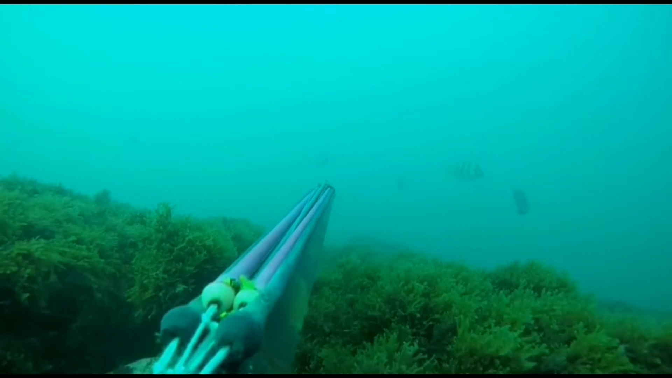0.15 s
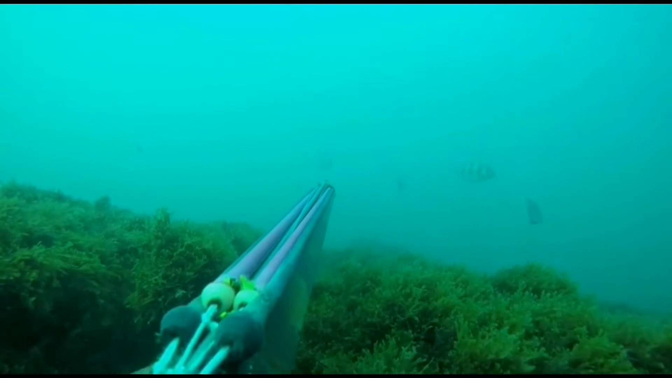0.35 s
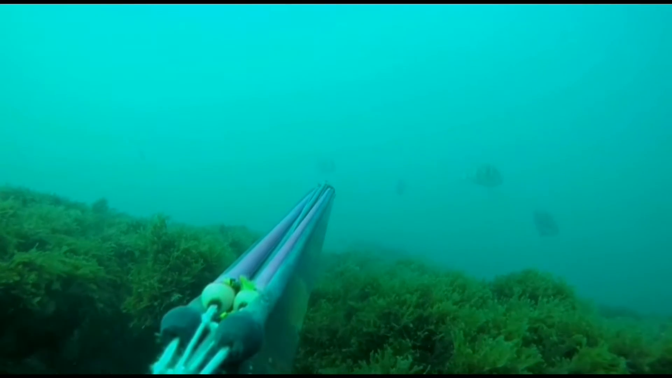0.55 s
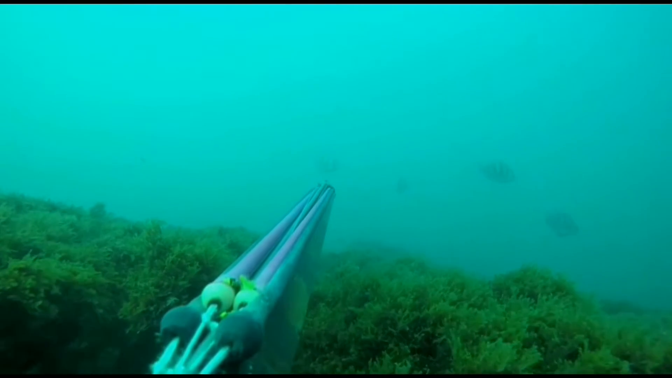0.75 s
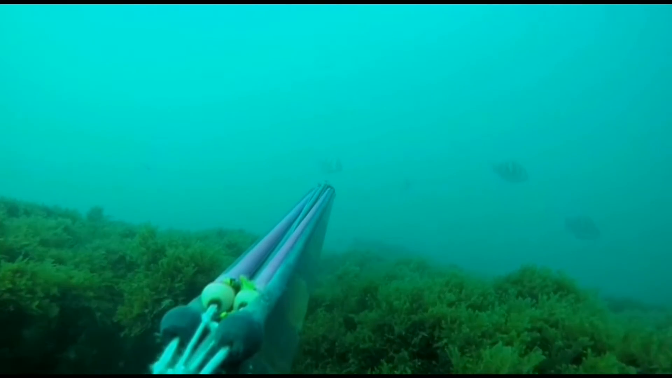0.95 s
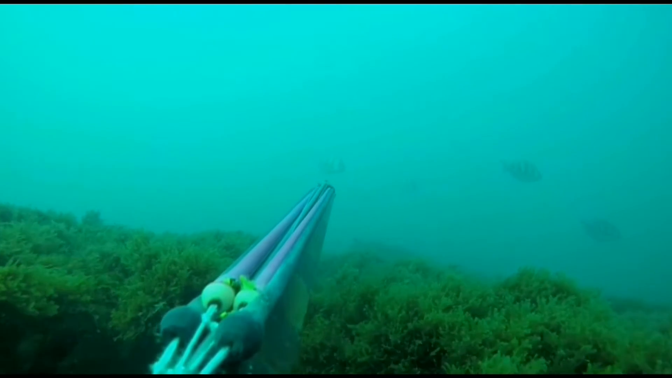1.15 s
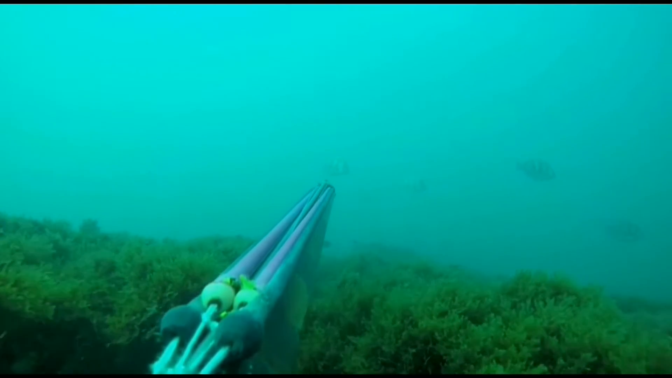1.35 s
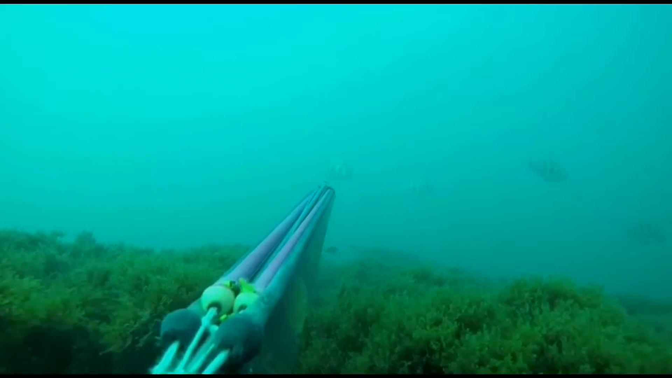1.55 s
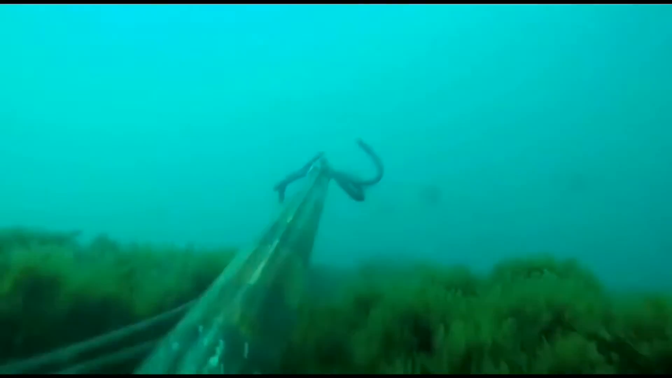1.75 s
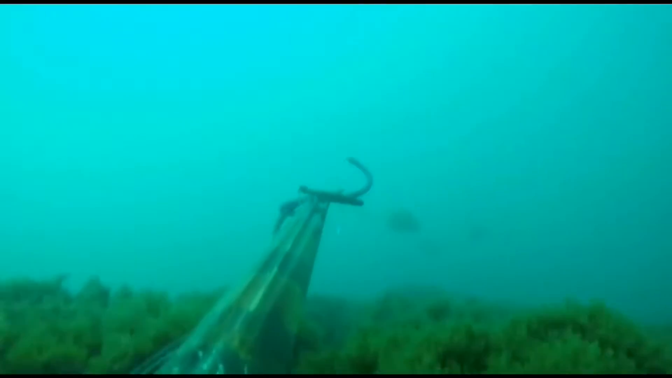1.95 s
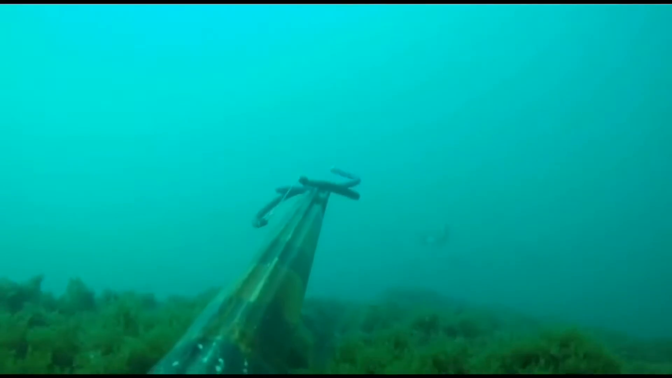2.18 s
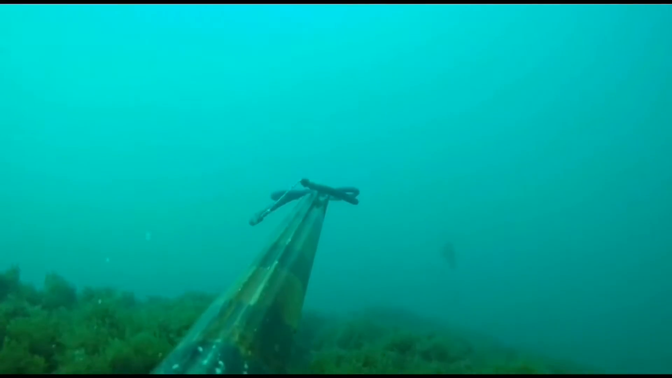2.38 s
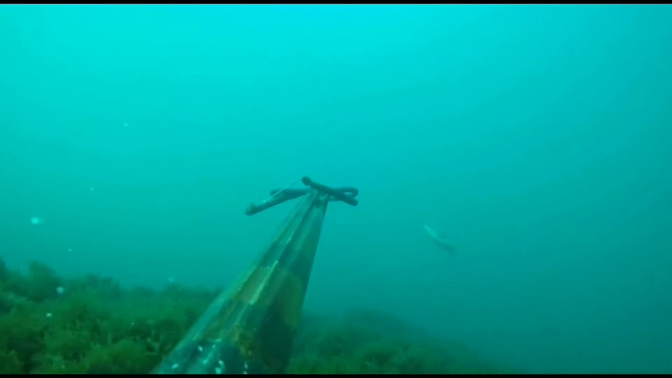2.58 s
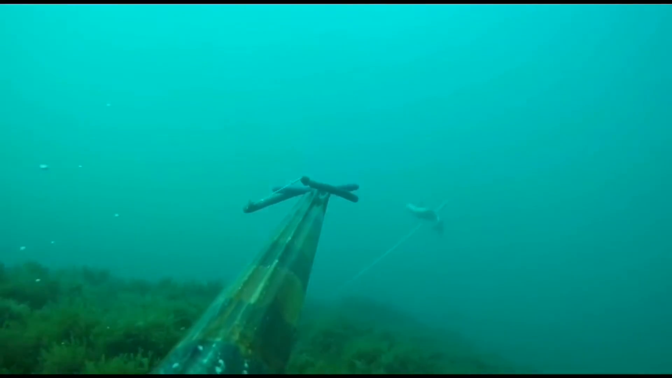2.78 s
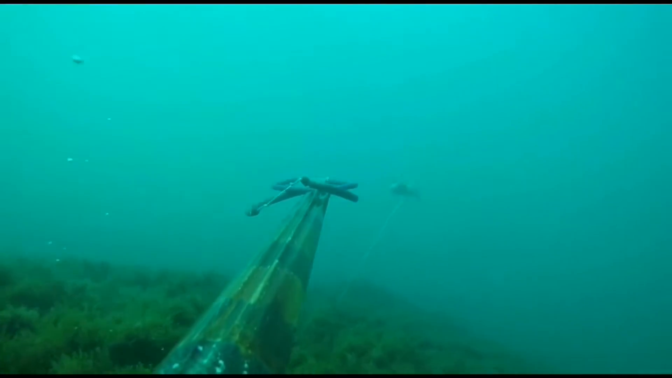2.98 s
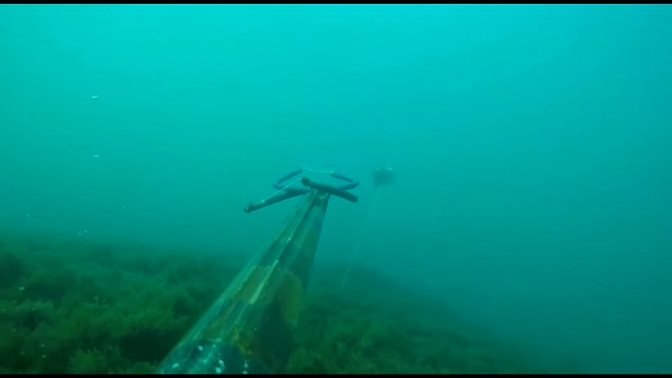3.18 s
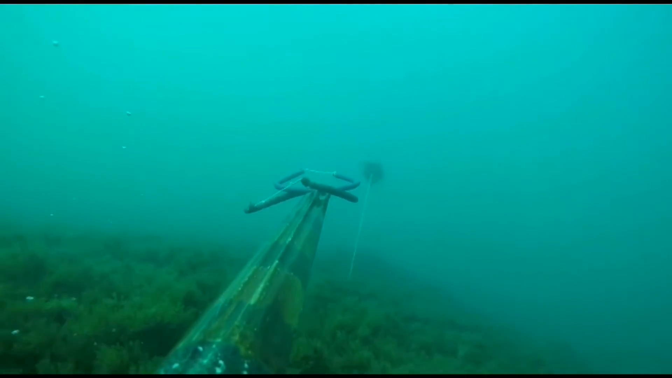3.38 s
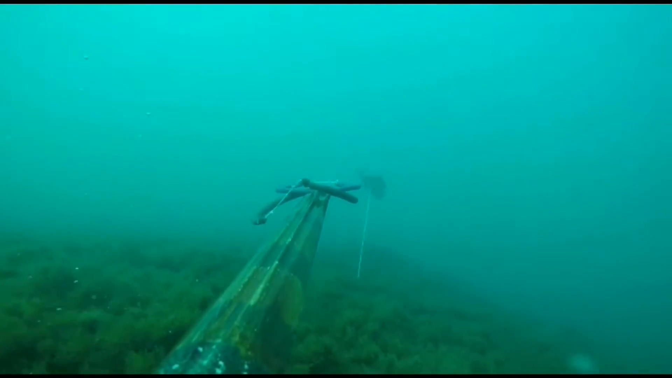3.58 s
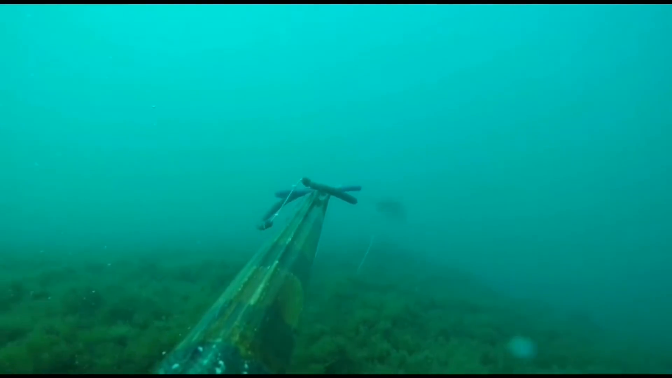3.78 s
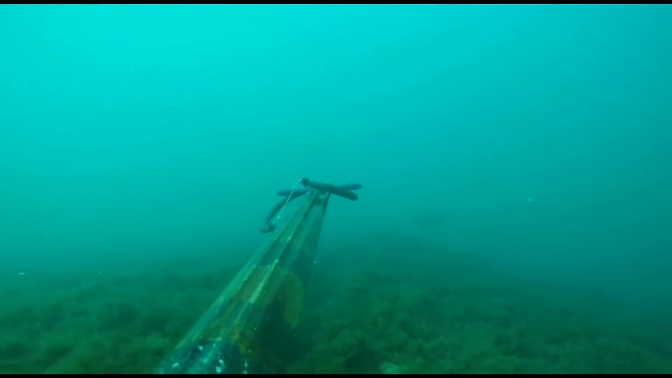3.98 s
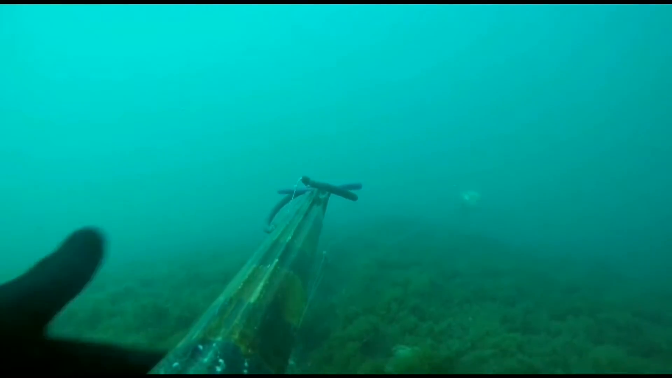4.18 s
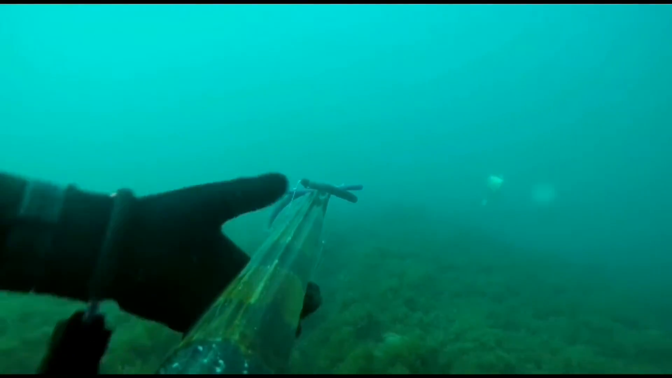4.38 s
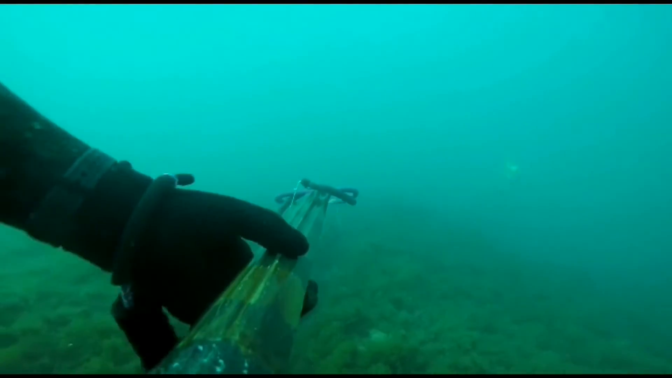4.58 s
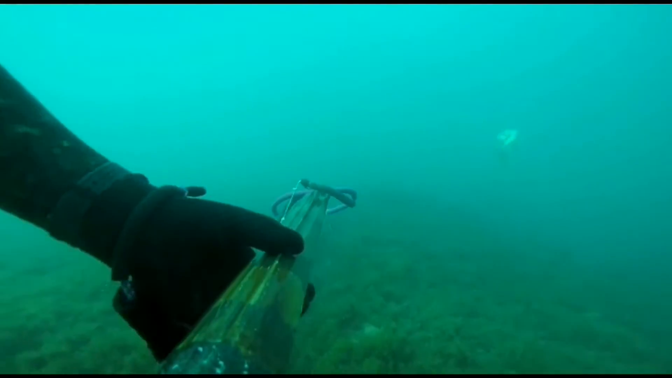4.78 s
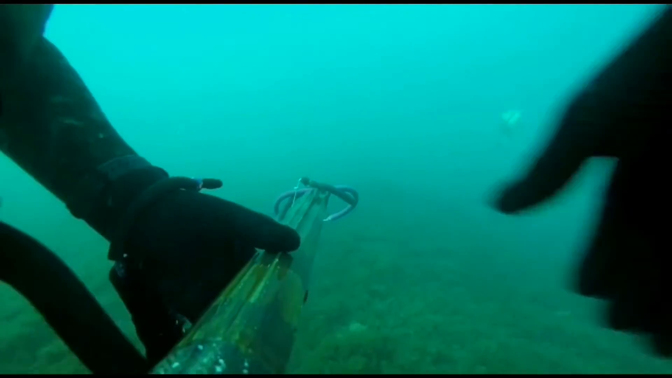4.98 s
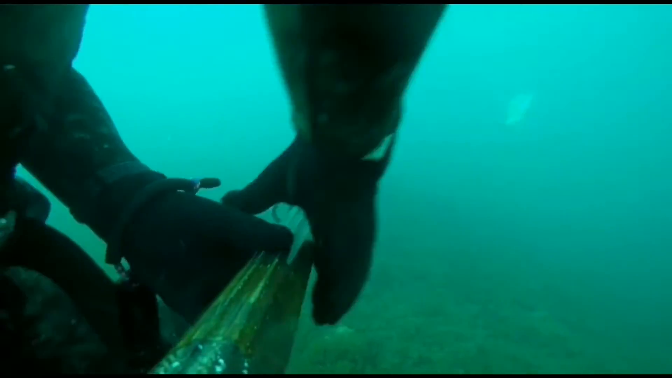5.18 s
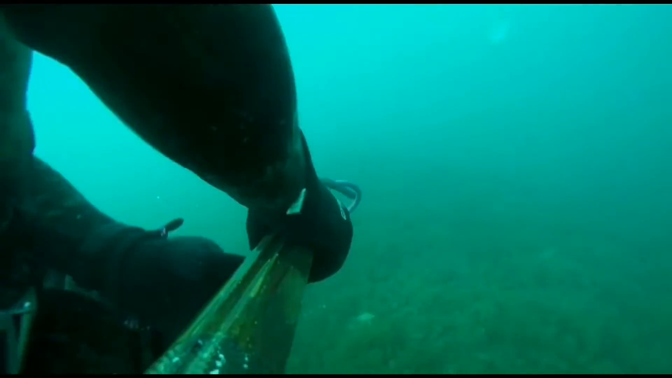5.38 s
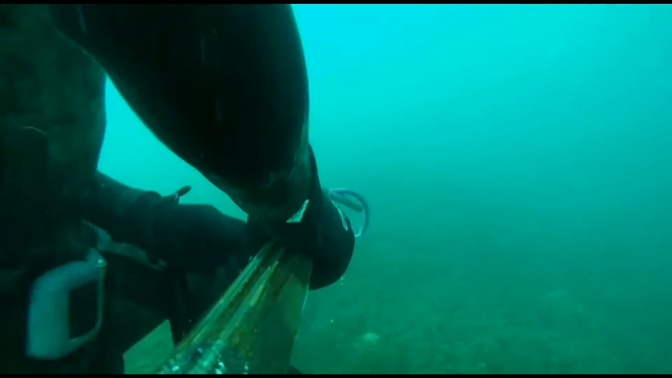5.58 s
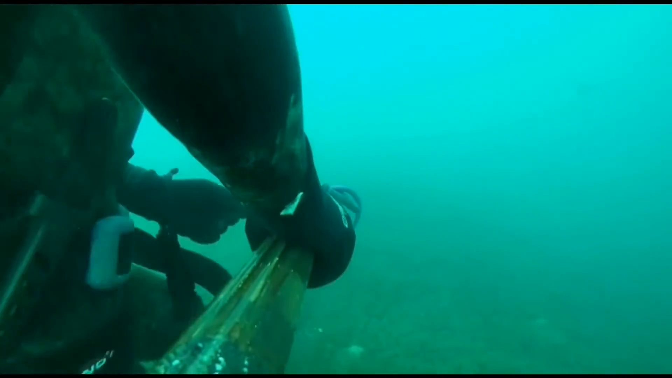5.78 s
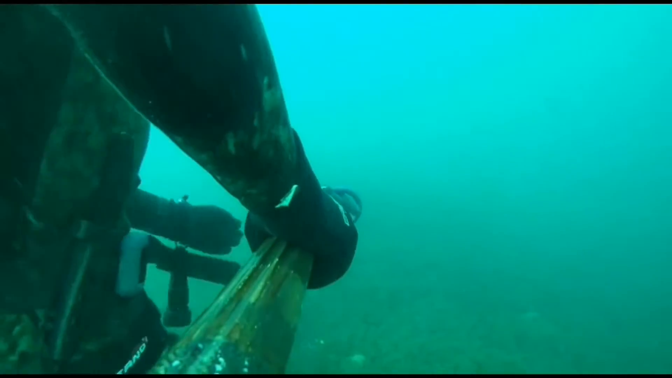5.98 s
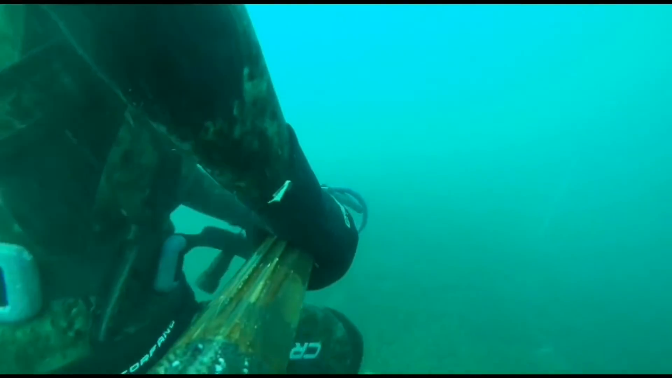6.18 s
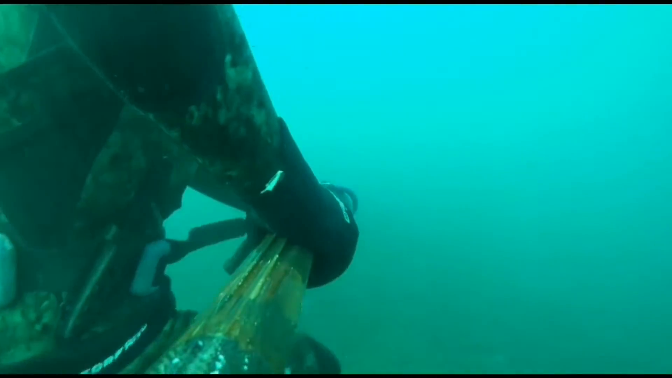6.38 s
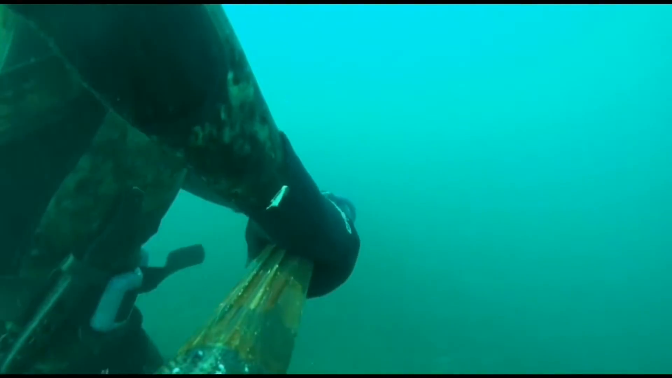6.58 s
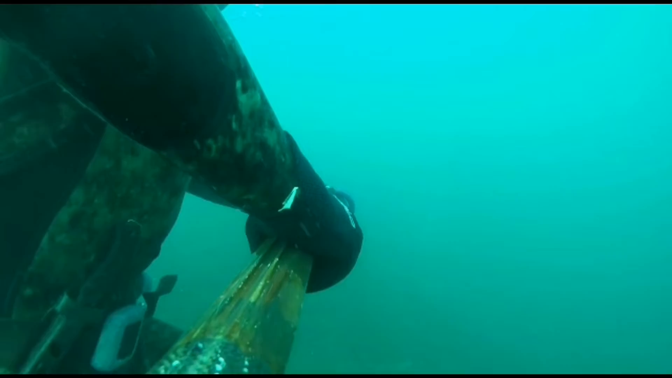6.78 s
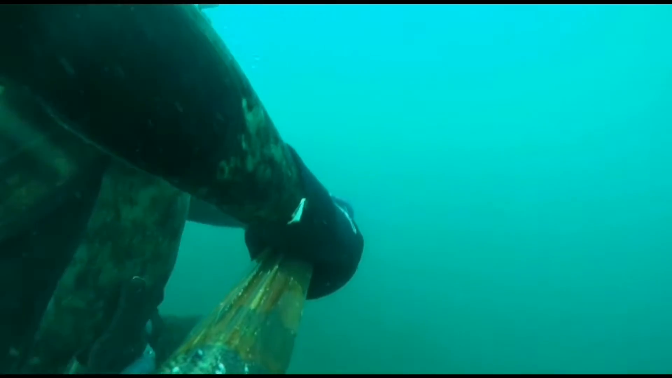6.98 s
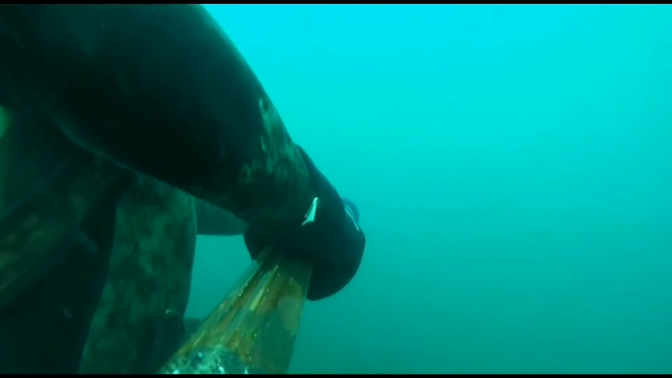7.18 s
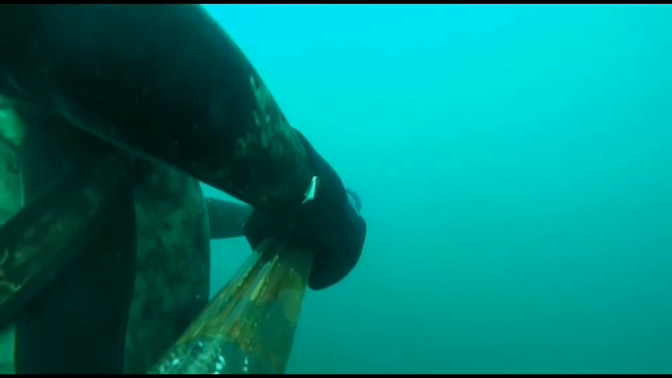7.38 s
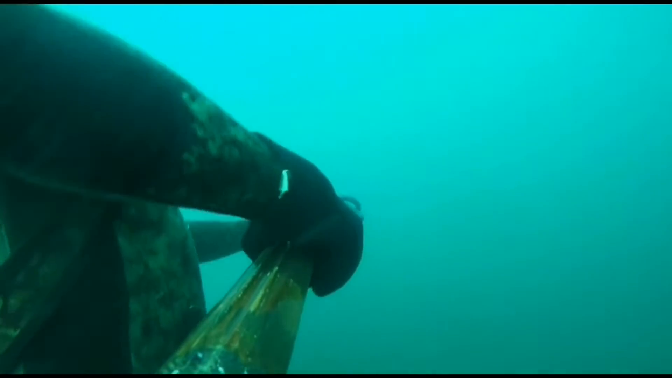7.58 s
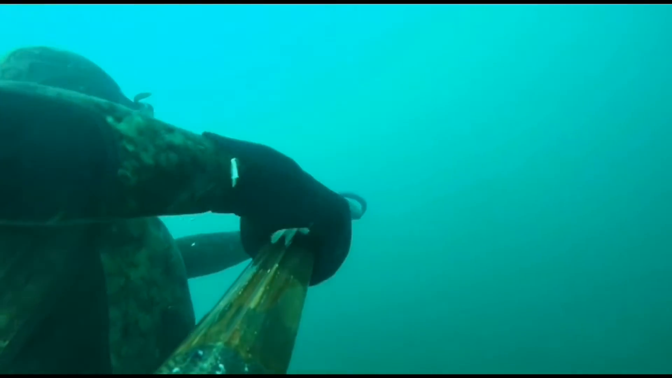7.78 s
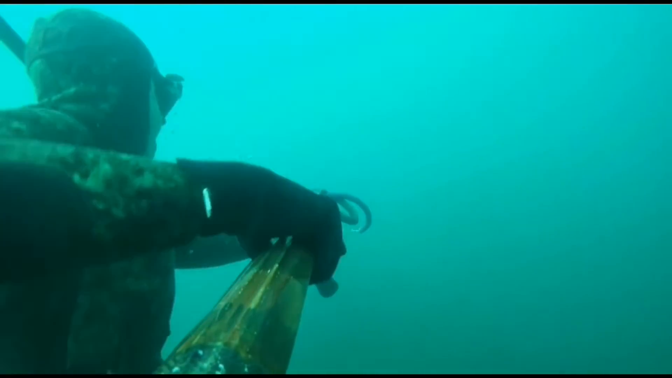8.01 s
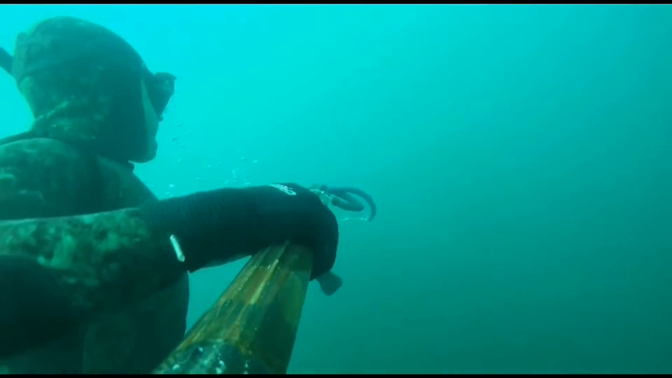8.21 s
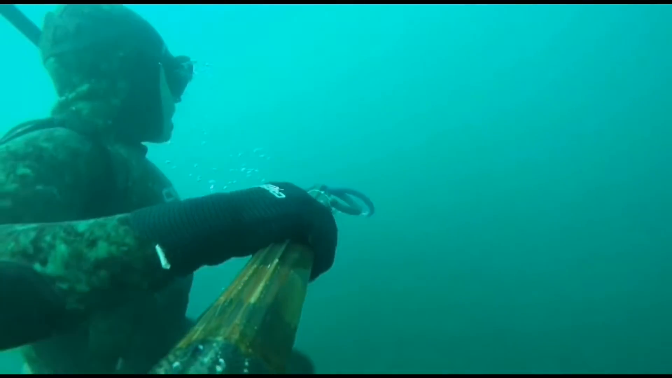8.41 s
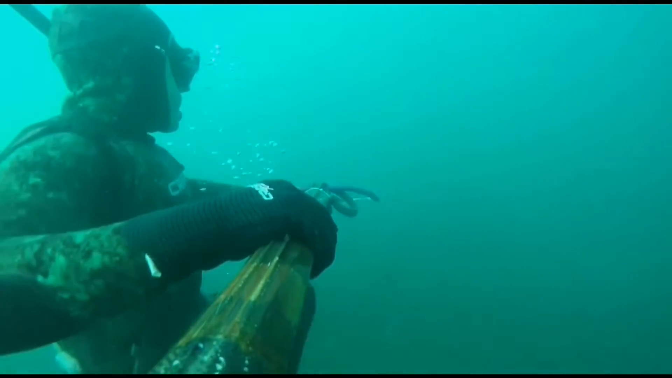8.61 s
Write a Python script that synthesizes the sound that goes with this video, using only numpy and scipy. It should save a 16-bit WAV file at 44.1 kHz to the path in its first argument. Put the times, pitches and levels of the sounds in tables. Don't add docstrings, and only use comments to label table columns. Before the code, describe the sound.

Underwater reef shrimp crackle and snap, then a speargun fires with a hard overloaded metallic crack, followed by muffled water rumble, wooden knocks and squeaks.

```python
import sys
import numpy as np
from scipy import signal
from scipy.io import wavfile
from scipy.ndimage import uniform_filter1d

SR = 44100
rng = np.random.default_rng(int(sys.argv[2]) if len(sys.argv) > 2 else 0)


def decibels_to_gain(level_db):
    exponent = np.asarray(level_db, float) / 20
    return 10 ** exponent


def inscribe(sig):
    pcm = np.round(np.clip(np.atleast_2d(sig).T, -1, 1) * 32767)
    wavfile.write(sys.argv[1], SR, pcm.astype(np.int16))


N = 381465
SHOT_S = 1.766


def rms_one(x):
    return x / np.sqrt(np.mean(x ** 2) + 1e-20)


def in_time(rows):
    s, *columns = np.transpose(rows)
    return [np.interp(np.arange(N) / SR, s, c) for c in columns]


def drift(per_s):
    knots = rng.standard_normal(round(N / SR * per_s) + 2)
    return np.interp(np.arange(N) / SR * per_s, np.arange(len(knots)), knots)


def surges(rows, rise_db_s, fall_db_s):
    t = np.arange(0, N, 64) / SR
    swells = []
    for s, db, held in rows:
        before, after = np.maximum(s - t, 0), np.maximum(t - s - held, 0)
        swells.append(db - rise_db_s * before - fall_db_s * after)
    return np.interp(np.arange(N) / SR, t, np.max(swells, axis=0))


def band(x, low_hz, high_hz, order=2):
    return signal.sosfilt(signal.butter(order, [low_hz, high_hz], "band", fs=SR, output="sos"), x)


def resonate(x, hz, width_hz):
    r = np.exp(-np.pi * width_hz / SR)
    poles = [1, -2 * r * np.cos(2 * np.pi * hz / SR), r * r]
    return signal.lfilter(np.array([1, 0, -1]) * (1 - r * r) / 2, poles, x + 1e-18)


def body(x, modes):
    return sum((-1) ** k * decibels_to_gain(db) * resonate(x, hz, width) for k, (hz, width, db) in enumerate(modes))


def grains(per_s, spread_db, most, size=1):
    sizes = decibels_to_gain(spread_db * np.minimum(rng.exponential(1, N), most)) * (rng.random(N) < per_s / SR)
    envelope = np.convolve(sizes, np.hanning(size + 2)[1:-1], "same")
    return rms_one(envelope * rng.standard_normal(N))


def evened(x, seconds, share):
    level = np.sqrt(uniform_filter1d(x ** 2, round(seconds * SR)) + 1e-12)
    return rms_one(x / level ** share)


def add(out, s, shape):
    i = round(s * SR)
    out[i:i + len(shape)] += shape[:N - i]


def dying(t60, count):
    t = np.arange(count) / SR
    return t, decibels_to_gain(-60 * t / t60)


def ducking_db():
    duck_db, hold_s, spring_s = 27.5, 0.4, 0.1
    creep_db, creep_s = 18.5, 1.18
    since = np.arange(N) / SR - SHOT_S
    free = np.maximum(since - hold_s, 0)
    spring = (duck_db - creep_db) * np.exp(-free / spring_s)
    creep = creep_db * np.maximum(1 - free / creep_s, 0)
    return (since > 0) * -(spring + creep)


# [f/Hz, width/Hz, level/dB]
HOUSING = [(1500, 370, -14), (2118, 110, -2), (2593, 453, -3.5), (3616, 200, -5.5), (4137, 286, -1.5),
           (5550, 670, -3.5), (7340, 1200, -8), (9200, 730, -11), (10520, 1300, -15.5), (14700, 2400, -26)]


def reef():
    crackle_db = -48.5 + ducking_db() + 0.3 * drift(4.3)
    hiss = decibels_to_gain(-4) * rng.standard_normal(N) + decibels_to_gain(-6) * grains(250, 4.5, 2.6, size=30)
    dull = hiss + decibels_to_gain(-7) * grains(200, 4.5, 2.4, size=60)
    bright = hiss + decibels_to_gain(-6.5) * grains(350, 4.5, 2.6, size=30)
    dull, bright = dull * decibels_to_gain(1.8 * drift(30)), bright * decibels_to_gain(2 * drift(30))
    low = decibels_to_gain(-25.5) * band(dull, 800, 2000)
    return decibels_to_gain(crackle_db) * rms_one(body(dull, HOUSING[:4]) + low + body(bright, HOUSING[4:]))


# [t/s, peak level/dB, part over 6 kHz against it/dB]
SNAPS = [(0.0782, -11.5, -14), (0.1348, -11, -8.5), (0.214, -19, -15), (0.3842, -36, 5),
         (0.4915, -22, -4.5), (0.511, -16, -9), (0.6083, -17.5, -22.5), (0.844, -20.5, -5),
         (0.866, -20, -2.5), (0.901, -24, -6), (0.9447, -18.5, -9), (1.051, -20.5, -10), (1.155, -16, -25),
         (1.3008, -20.5, -9.5), (1.3903, -26, -2.5), (1.448, -24.5, -9), (1.4592, -19.5, -7.5),
         (1.517, -21, -10), (1.705, -33, -20), (2.035, -43.5, -12), (2.093, -43.5, -8.5), (2.006, -46, -25),
         (3.4834, -24, -13),
    (3.3113, -21.5, -24),
    (3.673, -22.5, -7),
    (4.1649, -22.5, -0.5),
    (4.251, -20, -10.5),
    (4.3411, -15, -9),
    (4.7851, -11, -11),
    (5.034, -19, -8),
    (5.1815, -21, -5.5),
]
# [t/s, peak level/dB, part over 6 kHz against
# it/dB]
MORE_SNAPS = [(0.0278, -31, -16), (0.1735, -30, -14), (0.272, -38, -11.5), (0.3421, -38, -16),
              (0.4609, -36, -11), (0.7352, -29, -14), (0.815, -39, -17), (0.832, -25.5, -16),
              (0.9154, -27.5, -16), (1.0018, -34, -24), (1.1036, -33, -16.5), (1.1243, -29, -17),
              (1.1842, -32, -22), (1.269, -32.5, -10), (1.3656, -26.5, -18), (1.4915, -25.5, -16),
              (1.6372, -34, -18), (1.6756, -33, -20), (2.3675, -42.5, -16), (2.4049, -37, -18),
              (2.5506, -43, -15), (2.6609, -44, -15), (2.958, -36, -15), (2.9801, -34.5, -19),
              (3.0415, -36, -18), (3.113, -26, -22), (3.1577, -34.5, -12), (3.2151, -27.5, -14),
              (3.34, -30.5, -14), (3.4228, -33.5, -11), (3.4944, -28.5, -19), (3.5064, -26, -20),
              (3.5299, -23.5, -23), (3.5922, -30, -21), (3.6466, -32, -13), (3.7603, -27.5, -15),
              (3.7972, -29.5, -14), (3.8318, -31, -15), (3.878, -33, -7), (3.9195, -35, -11),
              (3.9544, -29.5, -13), (4.084, -28, -10), (4.2098, -33, -13), (4.369, -32, -14),
              (4.4353, -27, -15), (4.5361, -32.5, -12), (4.7284, -29.5, -13), (4.9048, -32, -17),
              (4.996, -30, -15), (5.292, -27, -22),
              (5.373, -26.5, -12), (5.4474, -28, -17), (5.4576, -25, -17), (5.4926, -26.5, -14),
                (5.5376, -23, -19), (5.6048, -30, -17), (5.6755, -16.5, -22), (5.73, -27, -14),
                (5.758, -25.5, -20), (5.7869, -28, -18), (5.835, -35, -8), (5.8457, -30.5, -13),
                (5.8848, -22, -15), (6.0682, -26.5, -17), (6.0825, -22.5, -15), (6.2029, -34, -11),
                (6.2294, -21.5, -12), (6.2524, -11.5, -18.5), (6.3132, -32, -14), (6.3383, -27.5, -15),
                (6.3585, -21, -16), (6.3988, -30.5, -11), (6.42, -30, -12), (6.4549, -24.5, -14),
                (6.4773, -26, -13.5), (6.6312, -30, -16), (6.6482, -25.5, -15), (6.7206, -24, -19),
                (6.8145, -33, -19), (6.893, -19, -19), (6.925, -30, -14), (6.957, -33, -7),
                (6.9756, -21, -11), (7.1555, -21, -16), (7.1892, -29, -14), (7.2505, -30, -18),
                (7.2506, -22.5, -20), (7.352, -33.5, -10), (7.384, -32, -15), (7.4281, -25.5, -17),
                (7.4676, -24.5, -14), (7.5169, -25.5, -16), (7.5962, -31, -15), (7.724, -36, -5),
                (7.7368, -27.5, -13), (7.8567, -41, -12), (7.8698, -30, -16), (7.9447, -21.5, -14.5),
                (8.0734, -31, -14), (8.1046, -32, -10), (8.1515, -30.5, -16), (8.167, -25, -15.5),
                (8.2264, -29, -19), (8.2528, -26.5, -16), (8.288, -30, -13), (8.381, -24, -17),
                (8.4019, -24, -19), (8.4468, -24.5, -15)]


def snaps():
    dull, bright = np.zeros(N), np.zeros(N)
    t, fall = dying(.028, count=1500)
    others = [(s, db + 4.5, bright_db + 7) for s, db, bright_db in MORE_SNAPS]
    for s, db, bright_db in SNAPS + others:
        click = decibels_to_gain(-28.5) * rng.standard_normal(len(t)) * fall
        click[rng.integers(200, 500, 2)] += decibels_to_gain(-11)
        click[:44] += rms_one(rng.standard_normal(44) * np.hanning(44)) * .17
        add(dull, s, decibels_to_gain(db + 18) * click)
        add(bright, s, decibels_to_gain(db + bright_db + 23.5) * click)
    low = decibels_to_gain(-26.5) * band(dull, 500, 1920)
    return body(dull, HOUSING[:6]) + low + body(bright, HOUSING[6:])


# [f/Hz, width/Hz, level/dB]
BARREL = [(330, 40.5, -3), (514.7, 75, -4), (632.7, 40, 4.5), (753, 131, -7), (1096, 89, -13),
          (1590, 97, -17.5)]
# [t/s, rub level/dB]
EFFORT = [(0.0, -74), (1.9, -72), (1.95, -56), (2.1, -71), (2.85, -71.5), (3.24, -55.5), (3.46, -58),
          (4.06, -63.5), (4.38, -56), (4.64, -45.5), (5.23, -58), (5.64, -41.5), (5.75, -49), (6.3, -49),
          (6.45, -36.5), (6.72, -38), (6.95, -42), (8.05, -48), (8.65, -49)]
# [t/s, level/dB, held/s]
ROCKS = [(0.7, -42.5, 1.0), (1.74, -31.5, .25), (3.4, -32.5, 0.055), (3.55, -31, .15), (4.03, -32, 0.011),
         (4.58, -18.5, 0.073), (4.86, -19.5, 0.014), (5.15, -31, .15), (5.5, -13, 0.072), (5.8, -21, 0.049),
         (6.15, -22, 0.067), (6.48, -18, 0.022), (6.63, -18.5, .02), (6.73, -18, .01), (6.91, -17, 0.052),
         (7.17, -24, .03), (7.3, -22, 0.018), (7.45, -27.5, .2), (7.81, -20, 0.078), (8.22, -14.5, 0.02),
         (8.42, -14.5, 0.0049), (8.6, -26.5, 0.056)]
# [t/s, drone level/dB, eddy level/dB]
SHOVES = [(1.92, -45.5, -41.5), (3.11, -51.5, -47), (3.31, -48.5, -38), (3.67, -45.5, -44.5),
          (4.13, -47.5, -41), (4.67, -48, -44), (4.85, -54, -39.5), (5.05, -58, -45), (5.25, -55.5, -38),
          (5.53, -39.5, -40), (5.76, -37, -38), (6.215, -35, -41.5), (6.6, -36.5, -45), (6.73, -33.5, -46),
          (6.88, -38.5, -47), (7.17, -39.5, -46), (7.44, -42, -35.5), (7.75, -40.5, -40.5),
          (8.01, -33, -40), (8.2, -30, -39), (8.41, -40, -44)]


def handling():
    rub_db, = in_time(EFFORT)
    effort_db = rub_db + 58
    shove_rise_db_s, shove_fall_db_s = 121, 132
    drone_shoves = [(s, db, 0) for s, db, _ in SHOVES]
    eddy_shoves = [(s, db, 0) for s, _, db in SHOVES]
    sway_db = np.maximum(-38.5 + 0.57 * effort_db, surges(ROCKS, 209, 181))
    drone_db = np.maximum(-60.5 + 0.79 * effort_db, surges(drone_shoves, shove_rise_db_s, shove_fall_db_s))
    eddy_db = np.maximum(-54 + 0.62 * effort_db, surges(eddy_shoves, shove_rise_db_s / 2, shove_fall_db_s / 2))

    white = rng.standard_normal((3, N))
    sway = evened(band(white[0], 27.14, 51.54, order=4), 0.064, 0.6)
    eddies = evened(band(white[1], 49, 118), 0.054, 0.68)
    hollow_hz = 181.6
    narrow = resonate(resonate(white[2], hollow_hz, 11), hollow_hz, 60)
    drone = evened(narrow + decibels_to_gain(-22.5) * band(white[2], 83, 280), .08, 0.36)

    slips = grains(120, 2.2, 2.1, size=120) + decibels_to_gain(-2) * white[0]
    rub = decibels_to_gain(-20.5) * band(slips, 200, 860)
    for k, (hz, width, db) in enumerate(BARREL):
        mode_db = db + 2.4 * drift(14) - 6.2 * np.log2(np.maximum(hz / 800, 1))
        rub = rub + (-1) ** k * decibels_to_gain(mode_db) * resonate(slips, hz, width)
    moved_water = decibels_to_gain(sway_db) * sway + decibels_to_gain(eddy_db) * eddies + decibels_to_gain(drone_db + 0.97) * drone
    return moved_water + decibels_to_gain(rub_db + 2) * rms_one(rub)


# [t/s, level/dB]
FLUTTER = [
    (4.5, -45),
    (4.87, -24.5),
    (5.08, -34.5),
    (5.78, -25.5),
    (6.53, -27.5),
    (6.6, -19),
    (7.67, -14.5),
    (8.0, -24.5),
    (8.65, -22.5),
]


def flutter():
    db, = in_time(FLUTTER)
    return np.sqrt(2) * decibels_to_gain(db) * np.sin(2 * np.pi * 16 * np.arange(N) / SR)


# [t/s, peak level/dB, loudest
# f/Hz, hard upper part/dB]
BLOWS = [(0.785, -37.5, 630, 1), (2.03, -77, 277, -12), (2.089, -79.5, 280.5, -10.5),
         (2.369, -52, 366, -32.5), (2.433, -52.5, 688, -3), (2.952, -54, 635, -6), (3.071, -34.5, 662, -40),
         (3.072, -39, 420, -40), (3.105, -42, 700, -40), (3.106, -33, 369, -39), (3.255, -49, 600, 4),
         (3.121, -36, 646, -38), (3.182, -46, 367, -16), (3.239, -45, 625, -6), (3.31, -53, 283, 5.5),
         (3.359, -43.5, 615, -0.5), (3.522, -59, 650, 7.5), (3.59, -62, 283, 11), (3.625, -46.5, 608, -11),
         (3.673, -43.5, 624, -2), (3.796, -41, 348, 0.5), (3.932, -37, 644, -2), (4.014, -39.5, 616, -7),
         (3.98, -46.5, 280, -31), (4.097, -44, 273, -35),
         (4.431, -40.5, 617, -29), (4.463, -42, 576, -8), (4.549, -46, 670, 5.5), (4.811, -40, 715, -3),
         (5.011, -45.5, 352, -7), (5.037, -34, 785, -16.5), (5.29, -36, 640, -29), (5.42, -38, 630, -12),
         (5.628, -39.5, 695, -7), (5.738, -28.5, 304, -22), (5.827, -40, 288, -13),
         (5.872, -32.5, 668, -12), (6.209, -32.5, 642, -31), (6.215, -34.5, 293, -30),
         (6.301, -28, 324, -29), (6.358, -32, 330, -20), (6.451, -28, 349, -7), (6.491, -34, 633, -16),
         (6.591, -38, 330, -27), (6.664, -26, 663, -37), (6.505, -29, 634, -27), (6.535, -35, 640, -24),
         (6.625, -34, 630, -19), (6.72, -30.5, 770, -21), (6.775, -32, 637, -25), (6.955, -35, 670, -8),
         (7.07, -45, 650, 1), (7.12, -46, 640, -3), (6.85, -36, 645, -23), (7.339, -36, 640, -37),
         (7.483, -36, 667, -10), (7.661, -32.5, 650, -26), (7.803, -29, 690, -20.5), (7.893, -42, 324, -27),
         (8.039, -34, 722, -21), (8.185, -28.5, 335, -25), (8.23, -29.5, 590, -13), (8.278, -39, 317, -1),
         (8.446, -36, 533, -9)]


def knocks():
    note, middle, upper, low = np.zeros((4, N))
    t, fall = dying(0.033, count=6000)
    for s, db, hz, upper_db in BLOWS:
        low_db = -44.5 + 0.34 * (db + 34.5) - 4.5 * np.log2(hz / 400)
        push = rng.standard_normal((3, len(t))) * fall
        ring_fall = decibels_to_gain(-60 * t * hz / 26)
        ring = np.minimum(t / 0.0021, 1) * ring_fall * np.sin(2 * np.pi * hz * t)
        thump = decibels_to_gain(-60 * t / 0.022) * np.sin(2 * np.pi * 420 * t)
        add(note, s, decibels_to_gain(db + 6) * ring + decibels_to_gain(db) * thump)
        add(middle, s, decibels_to_gain(db + 11.5 - 4.2 * (hz < 450)) * push[0])
        add(upper, s, decibels_to_gain(db + upper_db + 37.5) * push[1])
        add(low, s, decibels_to_gain(low_db + 31) * push[2] * (s > SHOT_S))
    soft = signal.lfilter(np.hanning(160) / 9, 1, middle * middle) ** .5
    middle = soft * rng.standard_normal(N)
    return note + body(middle, BARREL[:4]) + body(upper, BARREL[4:]) + resonate(low, 157, 92)


# [t/s, peak level/dB, start f/Hz, end f/Hz, t60/s]
PINGS = [(4.7697, 6, 2200, 1500, 0.005), (4.7678, -6.5, 2740, 2740, 0.025),
         (4.7684, -12, 2000, 1810, 0.015), (4.7686, -13.5, 1500, 1400, 0.021),
         (4.7818, -19, 4050, 2500, 0.005), (4.786, -4, 4700, 5000, 0.012),
         (4.786, -5.5, 2280, 2510, 0.0083), (.786, -21, 2390, 2300, 0.012), (0.788, -33, 453, 442, 0.069),
         (5.75, -21.5, 303, 324, 0.12), (5.762, -22.5, 229, 211, 0.19)]
# [t/s, peak level/dB, start f/Hz, end f/Hz, t60/s]
RINGS = [(1.743, -24, 724, 670, 0.062), (1.784, 1.5, 720, 650, .03), (1.79, -3, 4400, 4300, .01),
         (1.804, -7.5, 2000, 1930, .025), (1.8105, -13, 4700, 4750, .012), (1.836, -32, 3500, 3500, .015),
         (1.842, -37, 1500, 1500, .05), (1.8995, -36, 4150, 4100, 0.018), (1.9194, -30, 4040, 4000, .018),
         (1.922, -32, 1140, 1130, .04), (1.885, -36, 1350, 1350, .035)]


def pings():
    out = np.zeros(N)
    for s, db, start_hz, end_hz, t60 in PINGS + RINGS:
        t, fall = dying(t60, count=3000)
        wobble = uniform_filter1d(rng.standard_normal((2, len(t))), size=round(3 * SR / end_hz))
        wobble = wobble / wobble.std() * min(t60 / .025, 1)
        glide_hz = end_hz + (start_hz - end_hz) * np.exp(-4.5 * t / t60)
        hz = glide_hz * (1 + .05 * wobble[0])
        swell = np.minimum(t / (.04 * t60), 1) * decibels_to_gain(4 * wobble[1])
        add(out, s, decibels_to_gain(db) * fall * swell * np.sin(2 * np.pi * np.cumsum(hz) / SR))
    return out


# [t/s, level/dB, t60/s, centre f/Hz]
TRIGGER = [
    (1.9, -39, 0.04, 2400),
    (1.723, -27, 0.029, 1170),
    (1.742, -20, 0.13, 560),
    (1.743, -28, 0.051, 2500),
    (1.5, -30.5, .025, 2200),
    (1.756, -26, .05, 1700),
    (1.6, -36, .012, 5300),
]
# [t/s, level/dB, t60/s, centre f/Hz]
SHOT = [(1.779, 11.5, 0.026, 2600), (1.779, -1, 0.032, 4800), (1.7775, -7.5, .02, 2200),
        (1.781, 8, 0.035, 1500), (1.781, 0, 0.02, 1200), (1.782, -2, 0.025, 320), (1.798, -7, 0.056, 700),
        (1.81, -9.5, .06, 310), (1.782, -4, 0.087, 230), (1.79, -2, 0.008, 2500), (1.8, -9, 0.017, 3000),
        (1.805, -11, 0.0088, 4330), (1.8, -8.5, 0.038, 1400), (1.818, -12, 0.033, 1150),
        (1.811, -17, 0.012, 3200), (1.817, -11, 0.022, 3600), (1.822, -13, 0.024, 2400),
        (1.82, -7.5, 0.033, 680), (1.828, -25, .03, 4900), (1.838, -33.5, 0.015, 3510),
        (1.843, -28, 0.047, 1300), (1.829, -19.5, 0.081, 497), (1.864, -28, 0.0051, 9100),
        (1.875, -31, 0.023, 3000), (1.883, -23, 0.03, 2000), (1.888, -42, 0.014, 5460),
        (1.9, -38, 0.015, 3700), (1.899, -27.5, 0.034, 680), (1.92, -26.5, 0.035, 2100),
        (1.92, -30.5, 0.017, 3560), (1.931, -40, 0.019, 4100), (1.987, -34.5, 0.022, 1050),
        (1.85, -18, .15, 160), (1.865, -28, .05, 540), (1.879, -32, .012, 4500), (1.891, -33, .01, 3500),
        (1.8, -44, .08, 2300), (1.848, -33, .015, 2200)]
# [t/s, f/Hz, level/dB, t60/s, direction]
RECOIL = [
    (1.764, 25, -12, .15, 1),
    (1.787, 37, 10, .065, -1),
    (1.799, 62, -6, .05, 1),
    (1.812, 19, -2, .17, 1),
    (1.8245, 158, -4, .09, 1),
    (1.826, 60, -9, .04, -1),
    (1.845, 30, -12, .06, -1),
    (1.865, 24, -19, .3, -1),
]


def shot():
    rattles, swings = np.zeros((2, N))
    for s, db, t60, hz in TRIGGER + SHOT:
        t, fall = dying(t60, count=4000)
        contacts = decibels_to_gain(4 * rng.standard_normal(80).repeat(50))
        noise = rng.standard_normal(len(t)) * fall * contacts
        noise = noise * np.linalg.norm(fall) / np.linalg.norm(noise)
        rattle = resonate(resonate(noise, hz, .45 * hz), hz, 1.6 * hz) + decibels_to_gain(-38) * noise * fall
        add(rattles, s, decibels_to_gain(db - 7.5) * rattle * np.sqrt(SR / hz))
    for s, hz, db, t60, direction in RECOIL:
        t, fall = dying(t60, count=20000)
        add(swings, s, direction * decibels_to_gain(db) * fall * np.sin(2 * np.pi * hz * t))
    return rattles + decibels_to_gain(-2) * body(rattles, BARREL) + swings


# [t/s, level/dB]
SCRAPE = [
    (4.55, -70),
    (4.66, -50.5),
    (4.76, -49.5),
    (4.85, -78),
]


def scrape():
    db, = in_time([(4.45, -88)] + SCRAPE + [(4.9, -90)])
    return decibels_to_gain(db + 4) * rms_one(band(grains(2500, 3., 3.6, size=10), 600, 2400))


# [t/s, length/s, level/dB, start f/Hz, end f/Hz]
SQUEAKS = [(5.064, 0.0115, -33, 2870, 3000), (5.227, 0.0082, -28, 4840, 4300),
           (5.233, .006, -31, 4400, 5800), (5.269, 0.0071, -23.5, 2950, 2500),
           (5.272, 0.011, -29, 2420, 2230), (5.299, .010, -30, 2970, 2550), (5.305, .010, -32, 2510, 2320),
           (5.309, 0.01, -30, 2480, 3100), (5.319, 0.011, -36.5, 4003, 4300),
           (5.330, 0.019, -28.5, 2450, 3150), (5.353, 0.011, -38, 2210, 2150)]


def squeaks():
    out = np.zeros(N)
    for s, length, db, start_hz, end_hz in SQUEAKS:
        share = np.linspace(0, 1, round(length * SR))
        wobble = rms_one(uniform_filter1d(rng.standard_normal((2, 1200)), size=50))[:, :len(share)]
        hz = (start_hz + (end_hz - start_hz) * share) * (1 + 0.032 * wobble[0])
        swell = np.sin(np.pi * share ** 0.79) ** 0.88
        add(out, s, decibels_to_gain(db + 2.6 * wobble[1]) * swell * np.sin(2 * np.pi * np.cumsum(hz) / SR))
    return out


def scene():
    water = reef() + snaps() + handling() + flutter()
    gun = knocks() + pings() + shot() + scrape() + squeaks()
    return (water + gun)[None]


def band_limit(x):
    return signal.sosfilt(signal.butter(12, 16550, fs=SR, output="sos"), x)


def record(dry):
    clipped = dry / (1 + np.abs(dry / .95) ** 6) ** (1 / 6)
    low = signal.sosfiltfilt(signal.cheby2(14, 30, 15750, fs=SR, output="sos"), clipped)
    return band_limit(low + decibels_to_gain(-22) * (clipped - low))


dry = scene()
out = record(dry)
inscribe(out)
```